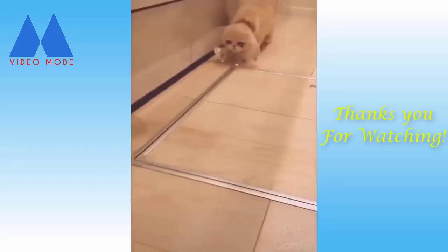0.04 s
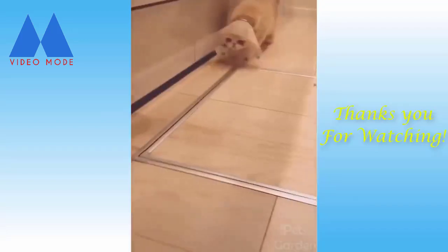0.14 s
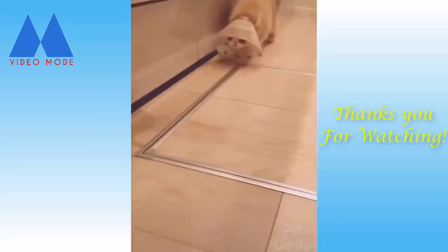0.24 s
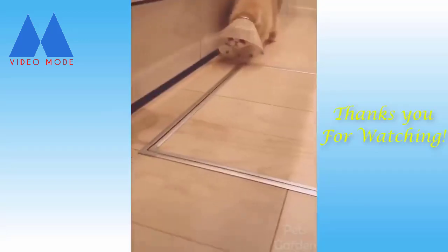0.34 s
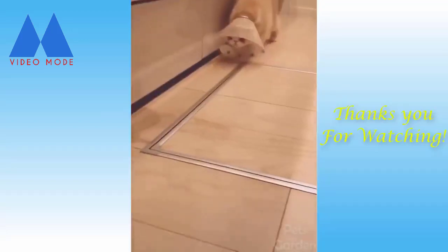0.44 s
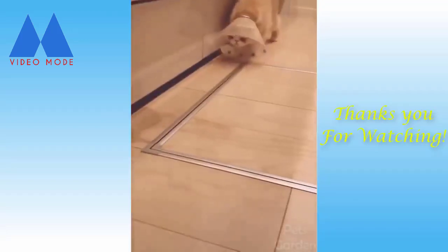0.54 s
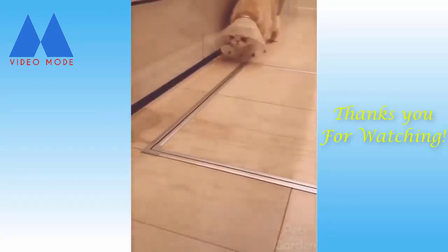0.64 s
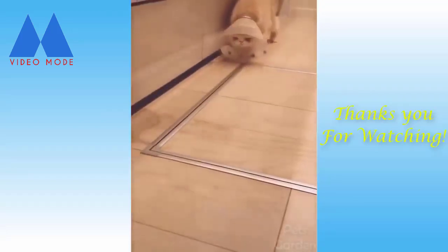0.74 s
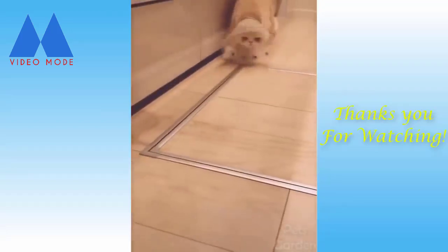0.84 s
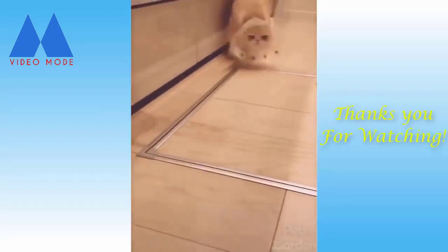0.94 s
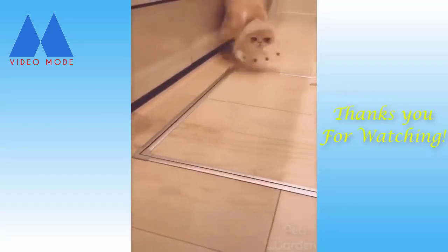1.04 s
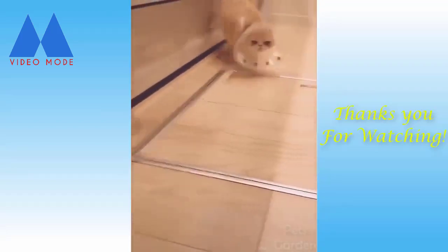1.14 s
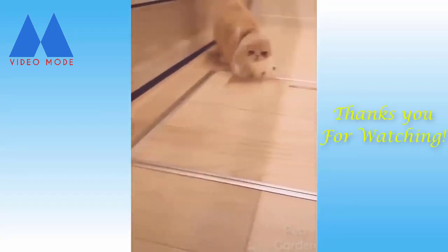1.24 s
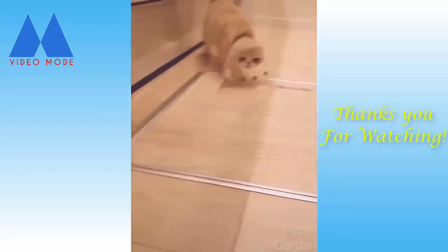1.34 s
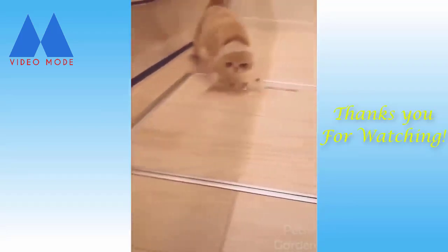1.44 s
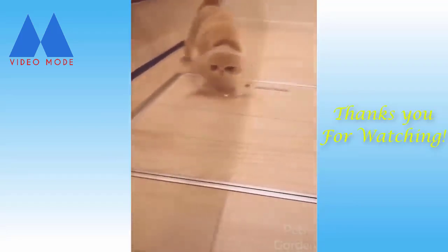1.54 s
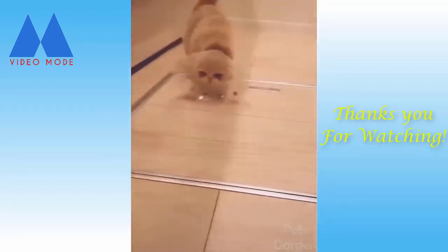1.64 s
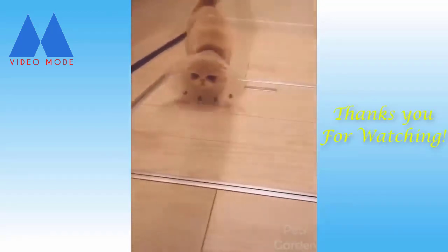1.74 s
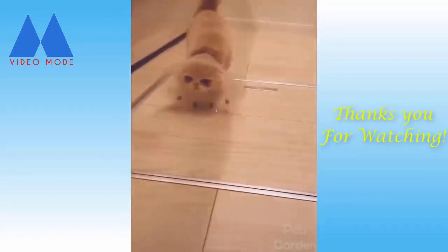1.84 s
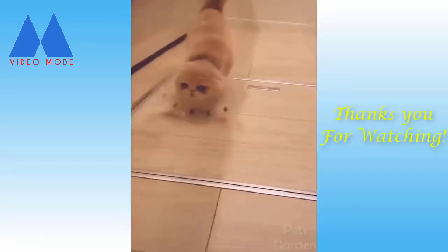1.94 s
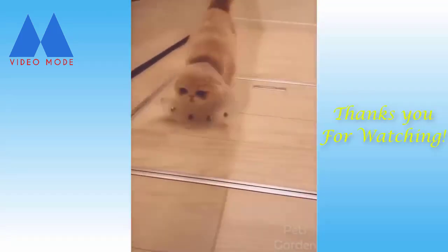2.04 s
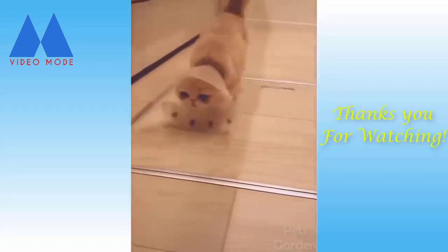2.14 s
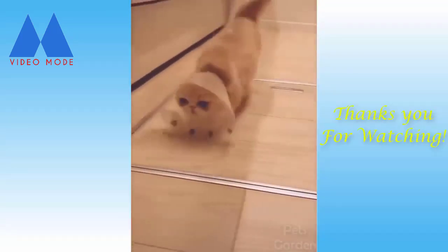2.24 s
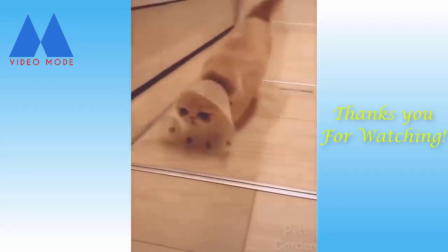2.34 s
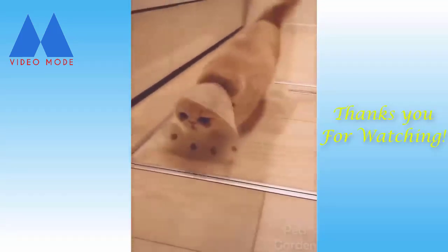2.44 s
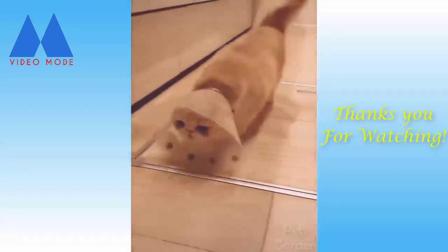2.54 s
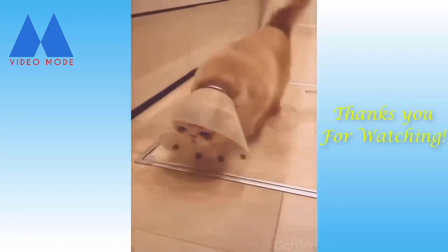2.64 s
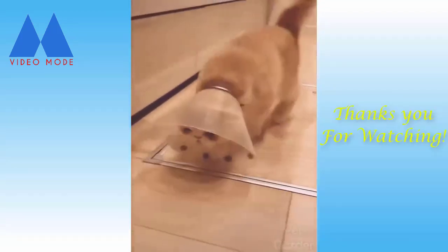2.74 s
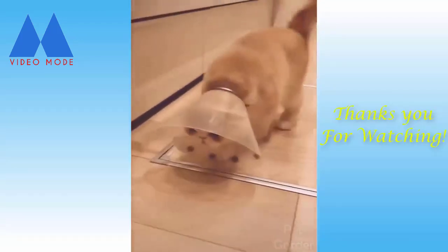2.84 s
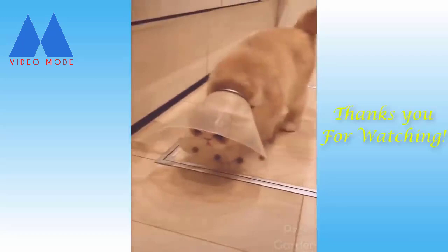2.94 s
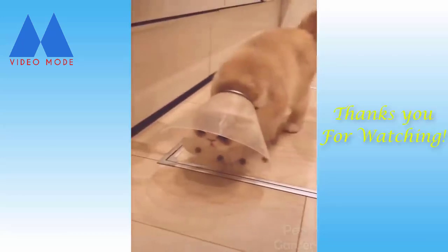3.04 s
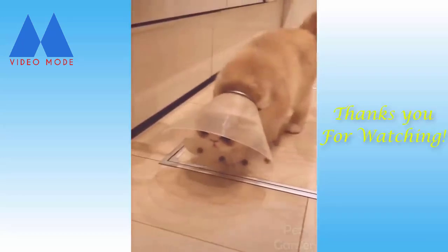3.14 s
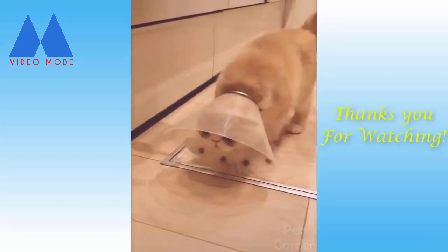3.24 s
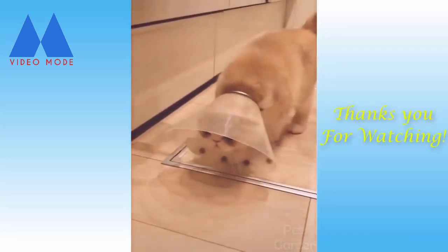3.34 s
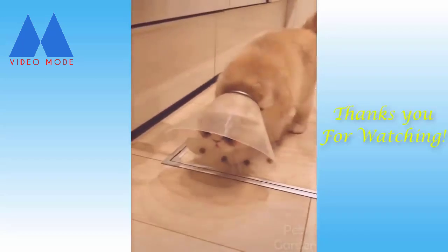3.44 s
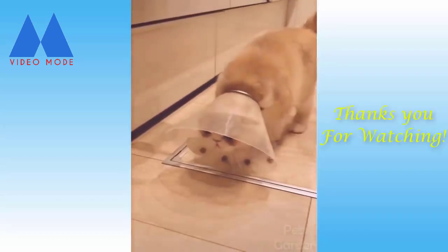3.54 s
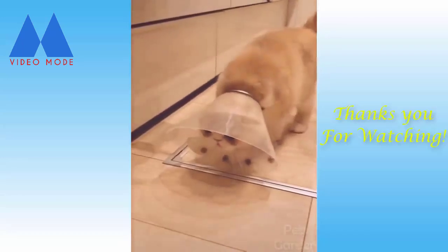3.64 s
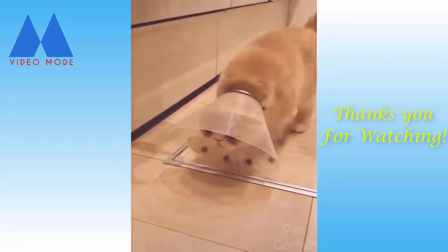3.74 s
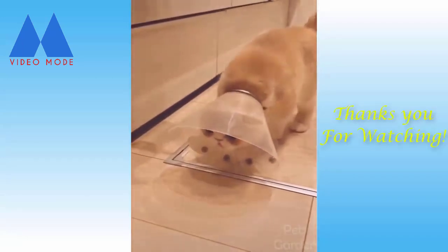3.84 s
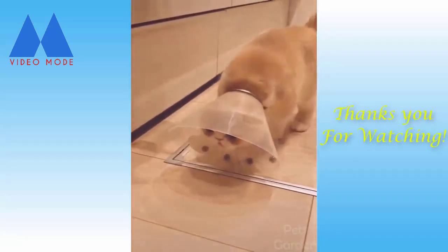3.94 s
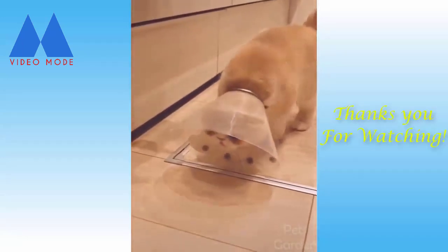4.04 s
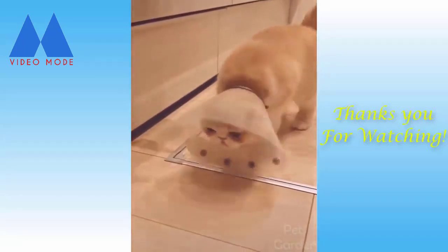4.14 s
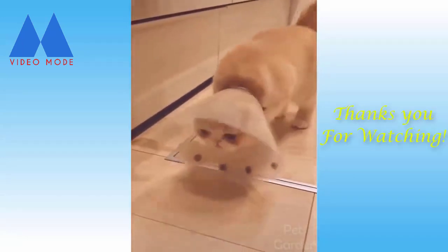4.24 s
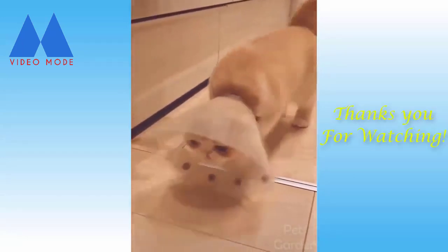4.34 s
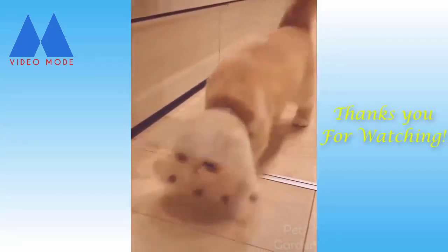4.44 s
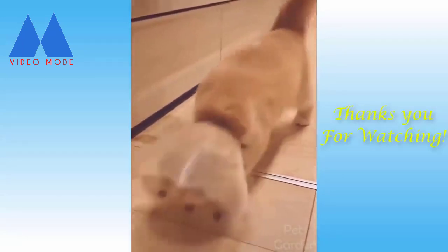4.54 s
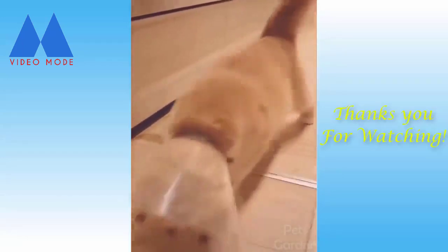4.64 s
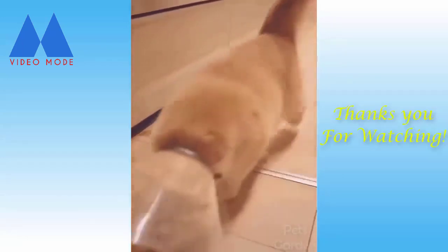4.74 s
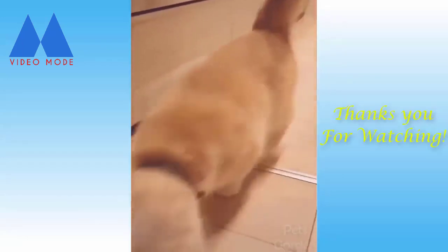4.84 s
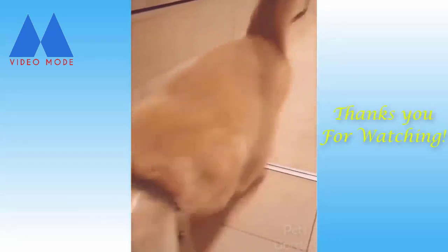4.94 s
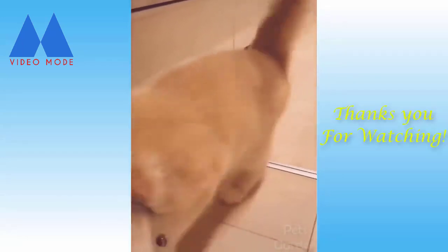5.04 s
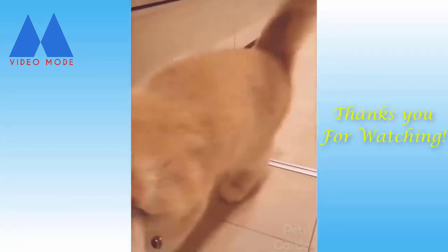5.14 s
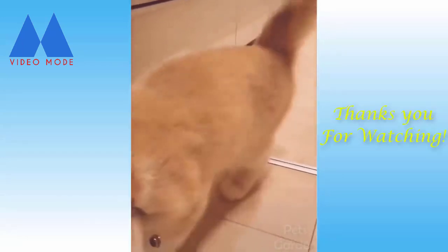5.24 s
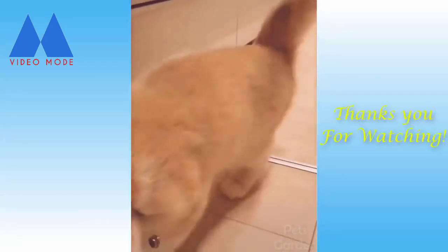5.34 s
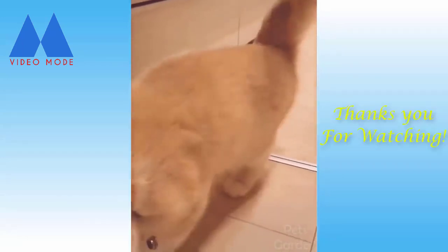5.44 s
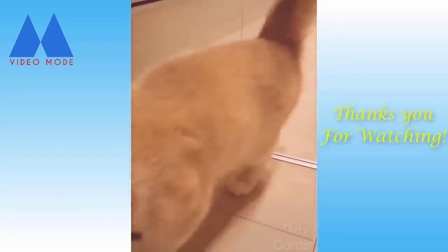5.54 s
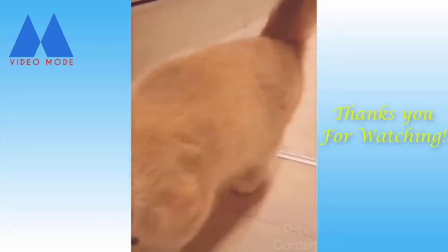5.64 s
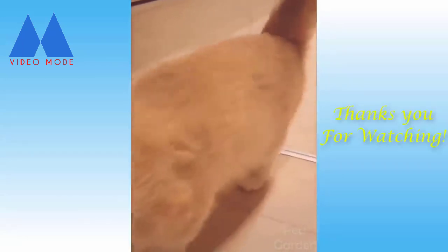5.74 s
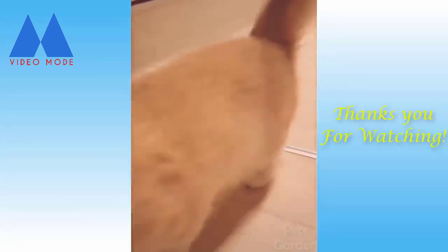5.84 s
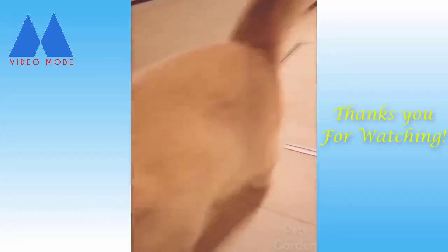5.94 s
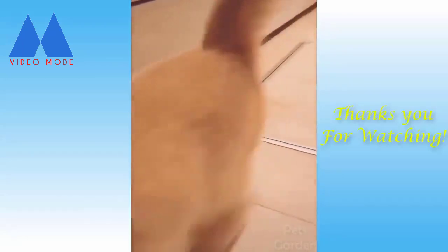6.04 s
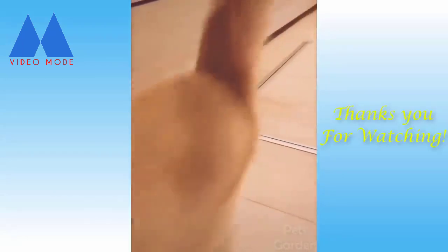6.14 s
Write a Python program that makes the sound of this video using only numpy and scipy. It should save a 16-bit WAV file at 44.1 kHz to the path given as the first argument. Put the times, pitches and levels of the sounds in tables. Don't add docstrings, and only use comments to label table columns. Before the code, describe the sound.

Small hard-tiled room, close phone microphone, faint low appliance hum and soft hiss throughout. From 0 s a plastic cone rim taps lightly and scrapes the tiles, with soft paw pads; at 0.27 s it catches with a hollow, boxy knock and skids out quickly. From 0.45 to 1.45 s only faint grazes, small ticks and soft steps. At 1.5 s sharp taps start a longer gritty scrape, swelling and thinning in uneven pushes, with a strong tap near 2.1 s, until the loudest double knock at 2.8 s, a brief skid and two thin clicks at 2.9 s. Mostly room tone until 4.3 s, when taps and claw clicks resume. A dull knock at 4.8 s leads into brighter, slightly singing slides; another knock with a rebound lands at 5.2 s, then tiny rattling clicks. At 5.7 s the cone settles in a cluster of taps, and the room tone fades towards 6.2 s.

```python
import sys
import numpy as np
from scipy import signal
from scipy.fft import irfft
from scipy.io import wavfile
from scipy.ndimage import uniform_filter1d

SR = 44100
rng = np.random.default_rng(int(sys.argv[2]) if len(sys.argv) > 2 else 0)


def invert_db(level):
    return 10 ** (np.asarray(level, dtype=float) / 20)


def dump(signal):
    limited = np.clip(np.atleast_2d(signal).T, -1, 1)
    pcm = np.round(limited * 32767).astype(np.int16)
    wavfile.write(sys.argv[1], SR, pcm)


N = 273017

SHELL_THUD_HZ, TILE_THUD_HZ = 680, 263.6


def evened(x):
    return x / np.sqrt(np.mean(x ** 2) + 1e-20)


def read(points, hz):
    f, value = np.transpose(points)
    return np.interp(np.log(hz + 1), np.log(f + 1), value)


def add(mix, start_s, sound):
    part = mix[max(round(start_s * SR), 0):][:len(sound)]
    part += sound[:len(part)]


def resonate(x, hz, width_hz):
    hz = min(hz, 0.45 * SR)
    return _peak(x, hz, width_hz)


def wander(hz):
    size = int(SR / hz)
    return evened(uniform_filter1d(uniform_filter1d(rng.standard_normal(N), size), size))


def resonate(x, hz, width_hz):
    b, a = signal.iirpeak(min(hz, 0.45 * SR), hz / width_hz, SR)
    return signal.lfilter(b, a, x)


def resonate_twice(x, hz, width_hz):
    return resonate(resonate(x, hz, width_hz), hz, width_hz)


def contacts(t, t60, per_s):
    size, chance, sign = rng.random((len(t), 3)).T
    hits = (chance < per_s / SR) * np.sign(sign - 0.5) * size ** 2
    return hits * invert_db(-60 * t / max(t60, 0.004)) * np.sqrt(SR / per_s)


def floor():
    # hz, level_db (per Hz)
    tone_colour = [(15, -59.5), (25, -29), (34, -7.5), (48, -9.5), (87, -2.5), (173, -3.5), (403, -6.5),
                   (554, -16), (632, -11.5), (916, -20.5), (1020, -16.5), (4370, -28), (6000, -31.5),
                   (12600, -35), (14000, -52.5)]
    # pitch_hz, width_hz, level_db
    hum_lines = [(60.2, 2.9, -74.5), (103.4, 12, -77.5), (178, 6.5, -77), (233, 14, -89), (635, 61, -78.5)]
    # time_s, level_db
    fade = [(0, -38), (0.015, -3), (.03, 2), (1.0, 1.5), (2.0, 3.5), (4.501, 0), (5.199, 1.5), (5.5, -6),
            (5.9, -8), (6.19, -10.5)]
    frames, hz = N // 256 + 5, np.fft.rfftfreq(1024, 1 / SR)
    a, b, patches = rng.standard_normal((frames, 513, 3)).T
    patches = evened(uniform_filter1d(uniform_filter1d(patches, 8, 0), 8, 1))
    spectrum = (a + 1j * b) * invert_db(read(tone_colour, hz)[:, None] + 2.0 * patches)
    tone = invert_db(-67.5) * evened(signal.istft(spectrum, nperseg=1024, noverlap=768)[1][:N])
    hum = sum(invert_db(db) * evened(resonate(rng.standard_normal(N), f, w)) for f, w, db in hum_lines)
    whine = invert_db(-92.5) * evened(resonate(rng.standard_normal(N), 5920, 30))
    t = np.arange(N) / SR
    hum += whine * (t < 4.3)
    return (tone + hum) * invert_db(np.interp(t, *np.transpose(fade)))


def tick(hz, t60, thud_db, thud_hz):
    t = np.arange(6000) / SR
    first = contacts(t, 0.3 * t60, 9000)
    after = contacts(t, 1.6 * t60, 6000)
    burst = (first + 0.22 * after) * (1 - np.exp(-t / 0.0008))
    band_hz = [0.51 * hz, min(2.4 * hz, 0.45 * SR)]
    wide = signal.lfilter(*signal.butter(2, band_hz, "band", fs=SR), burst)
    lag_s = 0.0025
    thud = resonate_twice(np.roll(burst, round(lag_s * SR)), thud_hz, 480)
    return 1.1 * wide + 2.1 * resonate(burst, hz, 1000) + invert_db(thud_db + 0.5) * thud / abs(thud).max()


def rim_taps(touches):
    # start_s, peak_db, centre_hz, thud_db
    taps = [(0.024, -59, 1200, 12), (0.0324, -49.5, 4030, -1), (0.169, -40, 2540, -16.5),
            (0.671, -63, 2000, 8.5), (1.0779, -49.5, 4050, -1), (1.5166, -39, 1200, -24),
            (1.5183, -29.5, 3900, -4), (1.525, -25, 2070, -17), (1.73, -39, 2150, -1.5),
            (2.0964, -21, 2180, -10), (2.4816, -34, 2660, -28.5), (2.8567, -35.5, 2300, -22.5),
            (4.3205, -42.5, 2120, -1.5), (4.326, -41, 4100, 8), (4.326, -29.5, 1410, -15),
            (4.3346, -43.5, 1500, -8), (4.7457, -26, 2190, -12), (4.785, -56, 2000, 3.5),
            (5.699, -49, 2930, 3.5), (5.7096, -33, 3060, -19), (5.7123, -27, 2010, -10),
            (5.7235, -40, 3200, -17), (5.7394, -48, 3460, -28), (5.7915, -51.5, 3296, -9)]
    for s, db, hz, thud_db in taps:
        add(touches, s, invert_db(db) * tick(hz, 0.052, thud_db, SHELL_THUD_HZ))


def slides():
    # time_s, pressure_db, brightening_db (speed), hollowness_db (cone lowered)
    first_push = [(0.03, -61.5, 4, 5.5), (.07, -55, 1, 3), (0.11, -46.5, -4, -10.5), (0.15, -69.5, 2, 2),
                  (.165, -64, 5, 0.5), (0.185, -58.5, 4, 9.5), (0.255, -54, -1, 3.5)]
    walk_in = [(1.54, -48, 7, -0.5), (1.63, -47.5, 3, -0.5), (1.72, -49.5, 2, -2.5), (1.8, -46, -3, -5.5),
               (1.88, -47, 2, -.5), (1.97, -56.5, 3, 5), (2.09, -43, -1, -5)]
    walk_on = [(2.115, -45, -0.5, -5.5), (2.2, -45.5, -1, -2.5), (2.28, -57, 2.5, 7.5), (2.34, -53.5, 1, 2),
               (2.41, -50.5, 1, 3.5), (2.445, -48, -5, -4.5), (2.47, -63, -7, -5)]
    walk_to_joint = [(2.49, -45, -1, -6.5), (2.53, -44, -5.5, -3), (2.6, -50.5, -0.5, 3),
                     (2.65, -55.5, 2, 3.5), (2.72, -49.5, -1.5, 0), (2.79, -43.5, 2.5, 0)]
    nudge = [(4.76, -54, -2.5, 3), (4.785, -50.5, 5, 2.5), (4.81, -43.5, -1.5, -3.5)]
    last_push = [(4.835, -44, 6, 2), (4.9, -42, 2.5, -2.5), (4.94, -52, 2, -2.5), (4.99, -57.5, 2.5, 4.5)]
    last_slide = [(4.998, -56, -2.5, 1), (5.05, -48.5, 4, -2), (5.085, -46.5, -0.5, -2),
                  (5.13, -52.5, -1, .5), (5.165, -52.5, -0.5, 2)]
    settling = [(5.685, -67, -15, -10), (5.705, -66, -11, 8), (5.742, -73, 2, -8)]
    # start_s, pressure_db, brightening_db, hollowness_db, fading_db_per_s
    skids = [
        (0.291, -55.5, 10, 7, 155),
        (2.85, -48.5, 11, 6, 202),
        (5.22, -68, 6, -15, 204),
        (5.77, -81, 1, 0, 150),
    ]
    # push, ridge_hz, ridge_db (above the rim)
    moves = [(first_push, 5000, -4.5), (walk_in, 4830, -4.5), (walk_on, 5000, -2),
             (walk_to_joint, 4600, -3.5), (nudge, 4200, -2.5), (last_push, 3720, 3.7),
             (last_slide, 3620, 5.1), (settling, 4260, -16)]
    skid_s = 0.13
    for s, db, bright_db, hollow_db, fading in skids:
        start = (s, db, bright_db, hollow_db)
        end = (s + skid_s, db - fading * skid_s, bright_db, hollow_db)
        moves.append(([start, end], 3900, -3))
    return moves


def excited(modes, grains):
    total = np.zeros(N)
    for hz, width_hz, db in modes:
        swell = invert_db(db + 2.6 * wander(16))
        shifted = np.roll(grains, rng.integers(N))
        total += swell * resonate_twice(shifted, hz, 1.6 * width_hz)
    return evened(total)


def scrape():
    # pitch_hz, width_hz, level_db
    shell_modes = [(660, 150, 0), (870, 130, 0), (1180, 170, 0)]
    wall_modes = [(1700, 220, 0), (2030, 220, 0), (2380, 240, 0), (2830, 270, -1)]
    rim_modes = [(3580, 470, 2), (3980, 690, -4), (5080, 820, -7.5)]
    grit_modes = [(6180, 920, 2.5), (7560, 1200, 2), (9060, 640, -11.5), (10270, 740, -5),
                  (12000, 2200, -6.5)]
    # rest_db, brightening_share, hollowness_share
    shares = [
        (-5, 0.13, 1),
        (-2, -0.51, 0.87),
        (-5, 0.089, 0.37),
        (-11.5, 0.98, 0),
    ]
    sizes = invert_db(2.6 * np.minimum(rng.exponential(1, N), 5))
    grains = sizes * rng.choice([-1, 1], N) * (rng.random(N) < 6000 / SR)
    chatter = invert_db(1.2 * wander(60))
    shell = excited(shell_modes, grains)
    wall = excited(wall_modes, grains)
    rim = excited(rim_modes, grains)
    grit = excited(grit_modes, grains)
    t, out = np.arange(N) / SR, np.zeros(N)
    rise_s, fade_s = 0.008, 0.02
    for rows, ridge_hz, ridge_db in slides():
        s, press_db, bright_db, hollow_db = np.transpose(rows)
        singing = rim + invert_db(ridge_db) * evened(resonate_twice(grains, ridge_hz, 810))
        edge = np.clip(np.minimum((t - s[0]) / rise_s, (s[-1] - t) / fade_s) + 1, 0, 1)
        for part, (db, bright, hollow) in zip((shell, wall, singing, grit), shares):
            level_db = press_db + db + bright * bright_db + hollow * hollow_db
            out += edge * invert_db(np.interp(t, s, level_db)) * part
    return chatter * out


def paw(hz):
    turns = np.arange(4000) / SR * hz
    return np.sin(2 * np.pi * turns) * (turns / 0.7) * np.exp(1 - turns / 0.7)


def paw_steps(touches):
    # start_s, peak_db, pitch_hz
    steps = [(0.057, -42, 680), (0.176, -52, 653), (0.294, -39, 332), (0.576, -57, 109),
             (0.797, -56.5, 270), (1.069, -53, 251), (1.44, -60.5, 190), (1.816, -45, 650),
             (3.129, -57.5, 223), (5.652, -51, 198), (5.707, -43.5, 206), (1.529, -50, 53.3),
             (2.813, -40, 71.5), (4.33, -54, 116), (4.83, -41, 89)]
    for s, db, hz in steps:
        add(touches, s, invert_db(db) * paw(hz))


def bent(colour, spread, lag_s):
    hz = np.fft.rfftfreq(2048, 1 / SR)
    lead = spread * (np.sqrt(hz) - np.sqrt(500)) ** 2 / np.sqrt(500)
    phase = -2 * np.pi * (hz * lag_s - lead)
    x = irfft(invert_db(read(colour, hz)) * np.exp(1j * phase))[:1024]
    return x / abs(x).max()


def knock(crack_db, crack_hz, blow_hz):
    # pitch_hz, level_db, t60_s
    hollow = [(119.1, -13, 0.22), (196.8, -4, 0.057), (294.6, -4.5, 0.069), (424, -12, 0.096),
              (492, -4, 0.033), (634, 1, 0.057), (700, -10.5, 0.1123), (1160, -20.5, 0.031)]
    # hz, level_db
    blow_colour = [(60, -20), (150, 5), (300, 7.5), (600, 0.5), (900, -9.5), (1300, -18), (2000, -34.5),
                   (4000, -56.5)]
    t = np.arange(8000) / SR
    modes = np.zeros(len(t))
    for hz, db, t60 in hollow:
        modes += invert_db(db - 60 * t / t60) * np.sin(2 * np.pi * (hz * t + rng.random()))
    modes *= 1 - np.exp(-t / 0.0022)
    shake = contacts(t, 0.045, 700) * (t > 0.005)
    x = invert_db(-13) * signal.fftconvolve(modes, shake / np.linalg.norm(shake))[:len(t)]
    swing = [(0.4 * blow_hz, -25), (blow_hz, 0), (1.7 * blow_hz, -25), (4 * blow_hz, -70)]
    lag_s, rise_s = 0.0052, 0.0013
    add(x, 0, 0.6 * bent(blow_colour, 0.05, lag_s) + 0.4 * bent(swing, 0.05, lag_s))
    grit = contacts(t, 0.018, 9000) * (1 - np.exp(-(t / rise_s) ** 3))
    crack = resonate(grit, crack_hz, 1200)
    crack -= 0.33 * resonate(grit, 3000, 1600) + 0.5 * resonate(grit, 1326, 630)
    return x + invert_db(crack_db + 12.5) * crack / abs(crack).max()


def joint_knocks(blows, touches):
    # start_s, peak_db, crack_db, crack_hz, blow_hz
    catches = [
        (0.266, -14.5, -27.5, 3520, 640),
        (2.805, -11.5, -15, 2000, 505),
        (2.814, -14.5, -26.5, 1657, 557.5),
        (4.819, -15, -14, 1030, 680),
        (5.174, -17, -26.5, 1800, 472),
        (5.19, -22.5, -20.5, 3950, 606),
    ]
    for s, db, crack_db, crack_hz, blow_hz in catches:
        add(blows, s, invert_db(db + 3.0) * knock(crack_db, crack_hz, blow_hz))
        snap = tick(4400, 0.08, -26.5, SHELL_THUD_HZ)
        add(touches, s + 0.00089, invert_db(db - 13.5) * snap)


def rim_grazes(touches):
    # start_s, peak_db, centre_hz
    rustles = [(0.4593, -50.5, 4840), (0.4764, -43.5, 3700), (0.7175, -48.5, 4260), (1.0362, -51, 4040),
               (1.2018, -62, 3470), (1.323, -56, 2550), (1.4344, -53, 4200), (4.3692, -55, 3140),
               (5.2085, -37, 3000), (5.2244, -41, 3860), (5.855, -65, 5680)]
    for s, db, hz in rustles:
        add(touches, s, invert_db(db) * tick(hz, 0.13, -8.5, TILE_THUD_HZ))


def claw_clicks(touches):
    # start_s, peak_db, centre_hz
    clicks = [(1.001, -44.5, 3460), (2.4478, -38, 6100), (2.8944, -32, 4600), (2.9104, -27, 4600),
              (4.36, -33, 4720), (4.411, -40, 4600), (4.6202, -32, 7650), (4.7735, -26.5, 6700),
              (4.8058, -35, 7100), (4.8903, -28, 7900), (5.2712, -30.5, 7900), (5.2864, -31, 3200),
              (5.3123, -32.5, 4100), (5.3478, -34.5, 3800), (5.651, -49, 2200), (5.657, -53, 3990),
              (5.693, -46, 4750), (5.717, -35, 3620), (6.175, -53.5, 2140)]
    for s, db, hz in clicks:
        add(touches, s, invert_db(db) * tick(hz, 0.025, -22.5, TILE_THUD_HZ))


def room(x):
    # hz, t60_s
    decay = [(100, 0.26), (300, 0.25), (700, 0.27), (2000, 0.3), (5000, 0.25), (12000, 0.19)]
    echoes = np.zeros(SR // 2)
    at = np.arange(200, SR // 2 - 20, 20)
    echoes[at + rng.integers(0, 20, len(at))] = rng.choice([-1., 1.], len(at))
    hz, t, z = signal.stft(echoes, SR, nperseg=256)
    dying = invert_db(-60 * t / read(decay, hz)[:, None])
    tail = signal.istft(z * dying, SR, nperseg=256)[1]
    return signal.fftconvolve(x, tail / np.linalg.norm(tail))[:N]


def scene():
    blows, touches = np.zeros(N), np.zeros(N)
    rim_taps(touches)
    strokes = invert_db(-1.5) * scrape()
    paw_steps(touches)
    joint_knocks(blows, touches)
    rim_grazes(touches)
    claw_clicks(touches)
    wet = room(invert_db(-13) * blows + invert_db(-12) * touches + invert_db(-9.5) * strokes)
    return (blows + touches + strokes + wet + floor())[None]


def band_limit(x):
    return signal.sosfilt(signal.butter(12, 14290, fs=SR, output="sos"), x)


def record(dry):
    x = signal.lfilter(*signal.butter(3, 45, "high", fs=SR), dry)
    lowpass = signal.firwin(255, 13150, window=("kaiser", 6), fs=SR)
    x = signal.oaconvolve(x, lowpass[None], "same")
    return band_limit(x)


dry = scene()
out = record(dry)
dump(out)
```